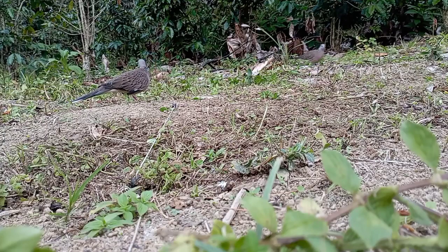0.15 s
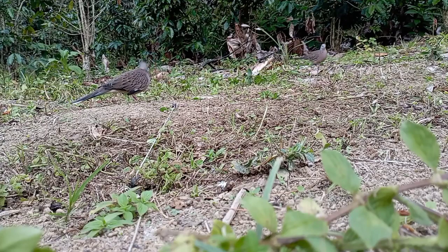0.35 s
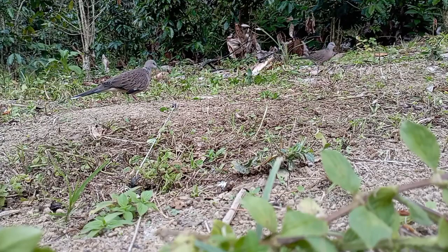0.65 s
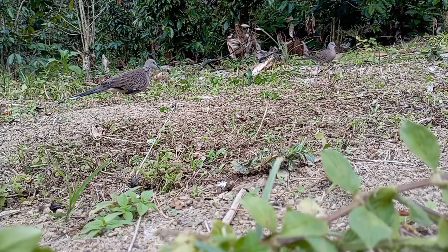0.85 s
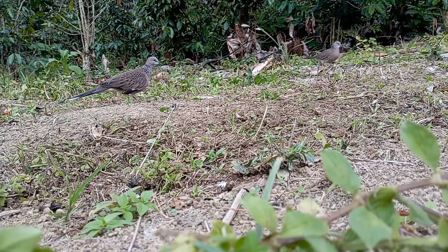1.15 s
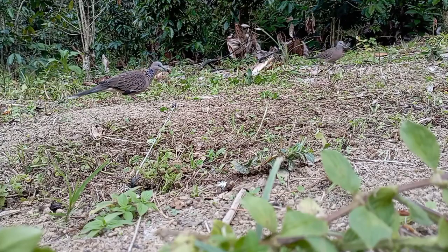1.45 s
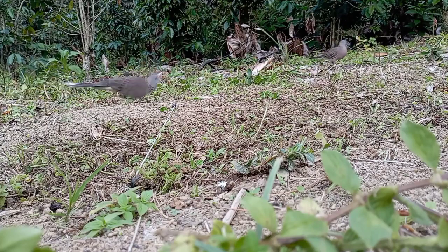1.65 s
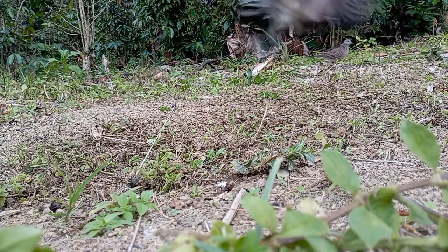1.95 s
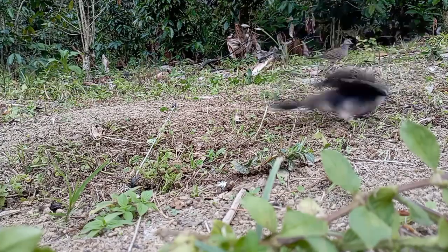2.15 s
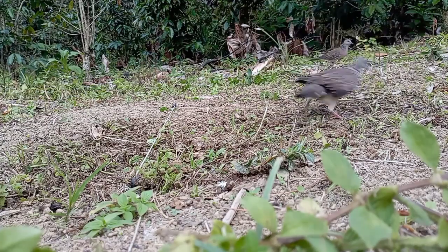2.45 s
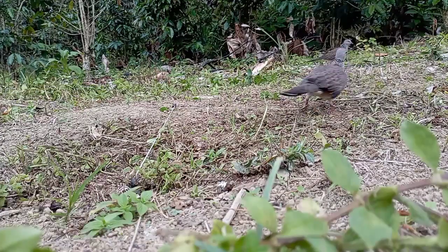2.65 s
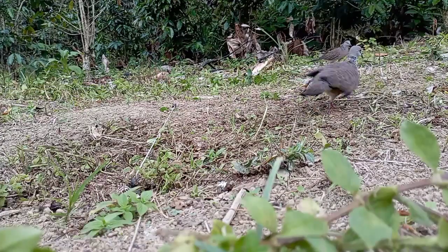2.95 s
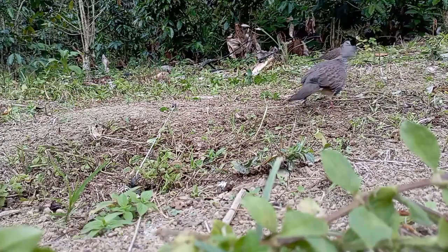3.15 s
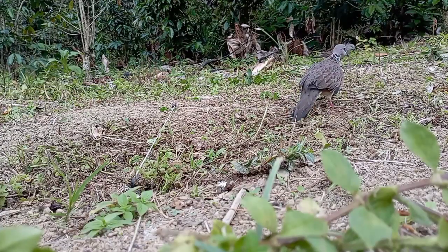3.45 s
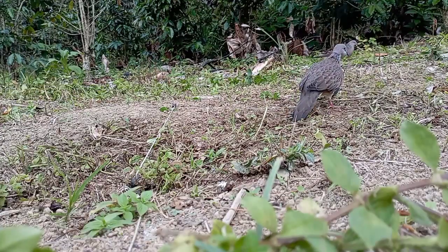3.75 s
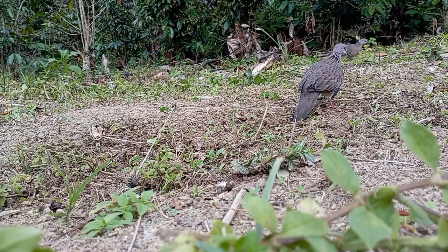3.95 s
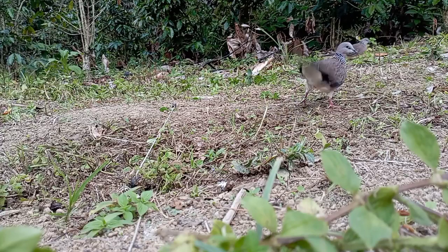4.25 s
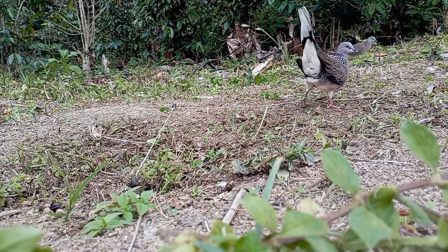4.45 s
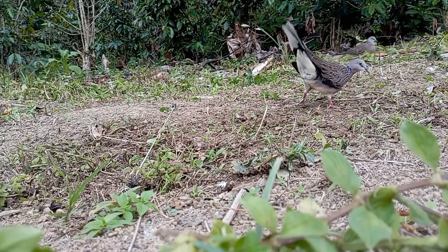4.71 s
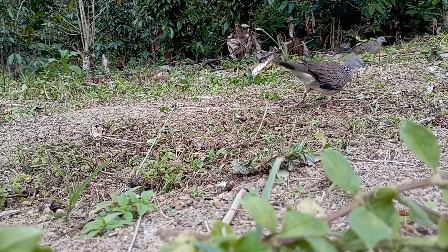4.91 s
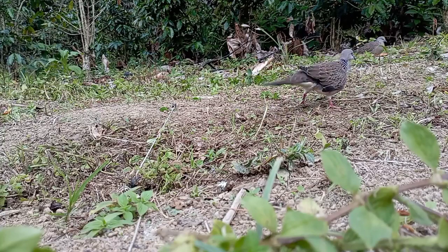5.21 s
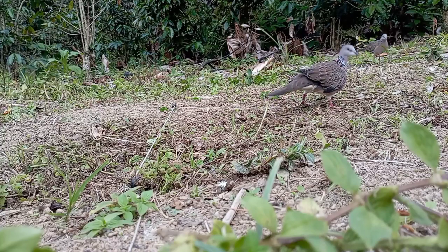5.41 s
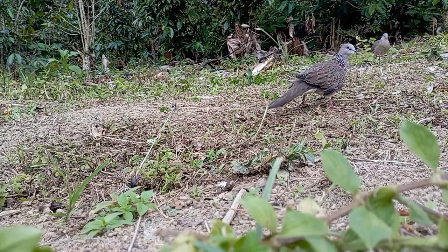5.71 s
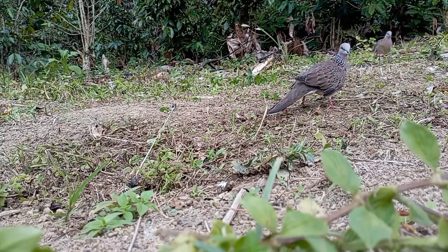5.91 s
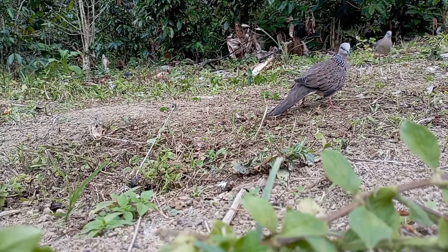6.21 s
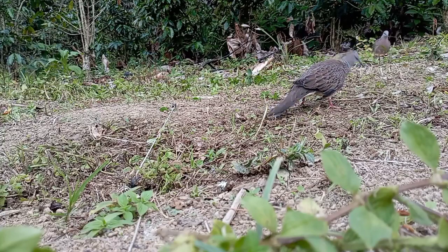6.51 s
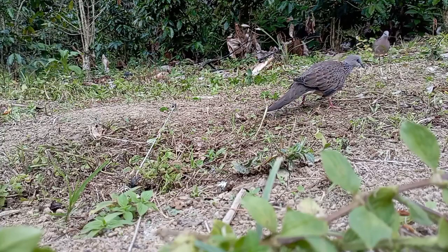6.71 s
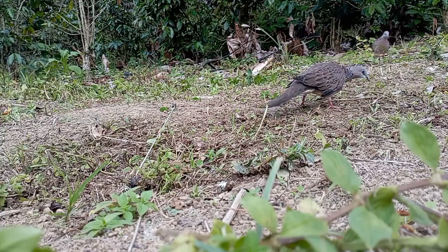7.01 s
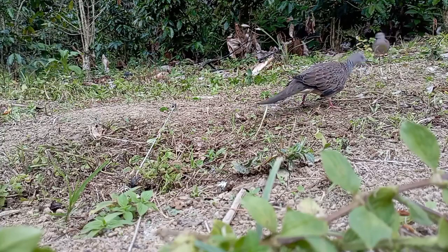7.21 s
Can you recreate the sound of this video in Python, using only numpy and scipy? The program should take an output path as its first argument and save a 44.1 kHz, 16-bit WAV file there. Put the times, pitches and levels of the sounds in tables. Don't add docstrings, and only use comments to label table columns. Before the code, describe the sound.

A dove's wings burst into a loud half-second clatter of claps and air puffs at 2 seconds, over quiet insect hiss and faint distant coos.

```python
import sys
import numpy as np
from scipy import signal
from scipy.fft import rfft, irfft, next_fast_len
from scipy.io import wavfile

SR = 44100
rng = np.random.default_rng(int(sys.argv[2]) if len(sys.argv) > 2 else 0)


def rack_gain(trim_db):
    fader = np.asarray(trim_db, float)
    return 10 ** (fader / 20)


def wav_record(signal):
    frames = np.transpose(np.atleast_2d(signal))
    bounded = np.clip(frames, -1, 1)
    quanta = np.round(bounded * 32767).astype(np.int16)
    wavfile.write(sys.argv[1], SR, quanta)


N = 325017

# (frequency [Hz], level [dB per Hz])
RUSTLE_SPECTRUM = [(1500, -8), (2570, -7), (3400, -5.5), (4460, -10.5), (6500, -5), (8770, -3.5),
                   (9700, 1.5), (12000, -7), (15300, -9.5), (16200, -46)]
# (frequency [Hz], left-right likeness [-1 to 1])
WING_LIKENESS = [(60, 0.97), (180, 0.97), (550, 0.92), (1650, 0.53), (4970, -0.38), (15000, 0.0015)]
SPREAD_S = 2.14


def rms_one(x):
    return x / np.sqrt(np.mean(x ** 2) + 1e-20)


def at_hz(points, hz):
    point_hz, value = np.array(points).T
    return np.interp(np.log(hz), np.log(point_hz), value)


def band(x, low_hz, high_hz):
    edges = [low_hz, min(high_hz, .45 * SR)]
    return signal.sosfilt(signal.butter(2, edges, "band", fs=SR, output="sos"), x)


def drift(rate):
    r = np.exp(-80 * np.pi * rate / SR)
    slow = signal.lfilter([1], [1, -2 * r, r * r], rng.standard_normal(N // 40 + 2002))
    slow = rms_one(slow[2000:])
    return np.interp(np.arange(N) / 40, np.arange(len(slow)), slow)


def coloured(spectrum, likeness, size):
    fast = next_fast_len(size, True)
    hz = np.maximum(np.fft.rfftfreq(fast, 1 / SR), 1)
    mid, side = rfft(rng.standard_normal((2, fast)))
    alike = np.clip(at_hz(likeness, hz), -1, 1)
    pair = np.sqrt(1 + alike) * mid + np.sqrt(1 - alike) * side * [[1], [-1]]
    return rms_one(irfft(pair * rack_gain(at_hz(spectrum, hz)), fast)[:, :size])


def air_noise(low_hz, high_hz, size):
    flat = [(20, 0), (20000, 0)]
    return rms_one(band(coloured(flat, WING_LIKENESS, size), low_hz, high_hz))


def panned(x, pan_db):
    return x * rack_gain([[pan_db / 2], [-pan_db / 2]])


def add(out, s, piece):
    i = round(s * SR)
    piece = piece[..., max(-i, 0):max(N - i, 0)]
    first = max(i, 0)
    out[..., first:first + piece.shape[-1]] += piece


def sine(hz):
    return np.sqrt(2) * np.sin(2 * np.pi * np.cumsum(hz) / SR)


def tone(hz, phase=0):
    return np.sqrt(2) * np.hanning(len(hz)) * np.sin(2 * np.pi * np.cumsum(hz) / SR + phase)


def foliage(x, wet_db, t60):
    t = np.arange(8192) / SR
    tail = rng.standard_normal((2, len(t))) * rack_gain(-60 * t / t60) * (t > .004)
    tail = tail / np.sqrt(np.sum(tail ** 2, axis=1, keepdims=True))
    return x + rack_gain(wet_db) * signal.oaconvolve(x, tail, axes=1)[:, :N]


def far_air():
    # (frequency [Hz], level [dB per Hz])
    spectrum = [(25, -43), (45, -14), (75, -0.5), (130, -1), (404, -8), (700, -14.5), (850, -21.5),
                (1700, -26), (4800, -24.5), (6900, -28), (9800, -26.5), (12800, -33), (15100, -34),
                (15350, -85)]
    # (frequency [Hz], left-right likeness [-1 to 1])
    likeness = [(60, 0.68), (180, 0.27), (550, 0.15), (1650, -0.11), (4970, -0.11), (15000, -0.0053)]
    level_db = -64 + 0.081 * drift(3.8)
    return rack_gain(level_db) * coloured(spectrum, likeness, N)


def hiss(choir, patchy_db, rate):
    out, white = 0, rng.standard_normal((2, 2, N))
    for k, (hz, width, level_db, pan_db) in enumerate(choir):
        noise = rms_one(band(white[k % 2], hz - width / 2, hz + width / 2))
        out = out + panned(rack_gain(level_db + patchy_db * drift(rate)) * noise, pan_db)
    return out


def cicadas():
    # (centre [Hz], width [Hz], level [dB], left minus right [dB])
    choir = [
        (8370, 670, -77, -1),
        (8696, 680, -70.5, 2),
        (9160, 430, -77, 3),
    ]
    # (time [s], level [dB])
    hush = [
        (2.2, 0.5),
        (2.5, -3),
        (2.799, -2.5),
        (3.1, -1.5),
        (4.5, 1),
    ]
    hush_db = np.interp(np.arange(N) / SR, *np.transpose(hush))
    return rack_gain(hush_db) * hiss(choir, patchy_db=0.8, rate=35)


def far_crickets():
    # (centre [Hz], width [Hz], level [dB], left minus right [dB])
    choir = [
        (5810, 300, -78, -3),
        (6180, 300, -79, -1),
        (5400, 300, -83, 0),
    ]
    return hiss(choir, patchy_db=2.5, rate=11.0)


def pulses(rows, from_hz, to_hz, ms, spread_db):
    out, chance = np.zeros(N), rng.standard_normal((len(rows), 2))
    track = np.linspace(from_hz, to_hz, int(ms * SR / 1000))
    for (s, level_db), (strength, turn) in zip(rows, chance):
        add(out, s - ms / 2000, rack_gain(level_db + spread_db * strength) * tone(track, np.pi * turn))
    return out


def trilling_cricket():
    # (first trill [s], last trill [s], trills [count])
    runs = [(-.11, .352, 3), (.568, 1.031, 3), (1.254, 2.875, 8), (3.099, 3.33, 2), (3.53, 3.976, 3),
            (4.208, 4.871, 4), (5.119, 5.358, 2), (5.582, 6.029, 3), (6.26, 6.715, 3), (6.947, 7.162, 2)]
    pulse_rate, rest = 62.6, 3.3
    starts = [np.linspace(a, b, count) for a, b, count in runs]
    starts = np.concatenate(starts + [[N / SR + .05]])
    rows = []
    for s, gap in zip(starts, np.diff(starts)):
        rows += [(s + k / pulse_rate, -71.5) for k in range(round(gap * pulse_rate - rest))]
    return panned(pulses(rows, 5080, 5750, ms=11, spread_db=2.0), 5)


def katydid():
    # (time [s], level [dB])
    first = [
        (.144, -83),
        (.423, -75),
        (.7, -79),
        (.981, -79),
        (1.259, -80),
        (1.54, -76),
        (1.822, -76),
    ]
    second = [(s + 0.062, level_db - 4.0) for s, level_db in first]
    return rack_gain(-1.0) * panned(pulses(first + second, 12200, 11900, ms=30, spread_db=0.5), 2.5)


def slow_cricket():
    # (first pulse [s], last pulse [s], pulses [count])
    runs = [
        (.355, .545, 4),
        (3.075, 3.541, 8),
        (4.864, 5.333, 8),
        (6.566, 7.019, 8),
    ]
    rows = []
    for a, b, count in runs:
        rows += [(s + gap, -78) for s in np.linspace(a, b, count) for gap in (-.009, .011)]
    return panned(pulses(rows, 4160, 4000, ms=20, spread_db=1.5), 4.5)


def falling_cricket():
    last = [
        3.148,
        3.467,
        3.778,
        4.057,
        4.372,
    ]
    counts, gap_s, level_db, swell_db = (1, 3, 3, 3, 3), .045, -73, 1
    rows = []
    for s, count in zip(last, counts):
        rows += [(s - k * gap_s, level_db - k * swell_db) for k in range(count)]
    return rack_gain(0.5) * panned(pulses(rows, 4800, 4140, ms=35, spread_db=-0.5), -1.8)


def near_singers():
    out = trilling_cricket() + katydid() + slow_cricket() + falling_cricket()
    return foliage(out, wet_db=-5, t60=.14)


def bird_notes(rows, rise_s, sag):
    out = np.zeros(N)
    for s, length, start_hz, top_hz, level_db in rows:
        u = np.linspace(0, 1, int(length * SR))
        track = top_hz - (top_hz - start_hz) * np.exp(-u * length / rise_s) - sag * length * u ** 3
        swell = signal.windows.tukey(len(u), .35)
        add(out, s, rack_gain(level_db) * swell * sine(track))
    return out


def doves():
    # (time [s], length [s], start pitch [Hz], top pitch [Hz], level [dB])
    coos = [
        (-.04, 0.083, 673, 670, -71),
        (.275, .15, 536, 767, -64.5),
        (.95, 0.094, 736, 694, -65.5),
        (1.385, .13, 558, 700, -69),
        (2.75, 0.095, 617, 710, -73.5),
        (5.8, 0.15, 577, 700, -79),
        (6.545, 0.091, 574, 772, -73.5),
    ]
    out = bird_notes(coos, .03, sag=680)
    s, end, rate, quickening = .61, .95, 20.3, 79
    t = np.arange(-.02, end - s, 1 / SR)
    throb = np.cos(np.pi * (rate * t + quickening * t ** 2 / 2)) ** 6
    swell = np.clip(0.55 + t / 0.25, 0, 1)
    purr = np.sin(2 * np.pi * np.cumsum(np.linspace(700, 710, len(t))) / SR)
    add(out, s + t[0], rack_gain(-67.5 + 7.5) * throb * swell * purr)
    return panned(out, -5.7)


def hoots():
    # (time [s], length [s], level [dB])
    short = [
        (.512, 0.021, -72),
        (.755, 0.026, -69.5),
        (.855, .045, -75),
        (.96, .041, -75),
        (1.09, .065, -77.5),
        (5.512, 0.02, -72),
        (5.73, 0.036, -74),
        (5.82, 0.029, -72),
        (5.925, 0.029, -73.5),
        (6.05, .029, -75),
    ]
    # (time [s], length [s], level [dB])
    held = [
        (.545, 0.11, -81),
        (.69, 0.033, -77),
        (5.545, 0.22, -81),
        (6.1, .06, -84),
    ]
    calls = [(s, length, 828, 1125, level_db) for s, length, level_db in short]
    calls += [(s, length, 1040, 1197, level_db) for s, length, level_db in held]
    return panned(bird_notes(calls, .014, sag=280), -2.7)


def whistle():
    # (time [s], length [s], start pitch [Hz], top pitch [Hz], level [dB])
    whistled = [
        (6.078, 0.094, 1660, 2800, -76),
        (6.165, .025, 2610, 2950, -82),
    ]
    return panned(bird_notes(whistled, .025, sag=2100), .1)


def birds():
    return rack_gain(-4.5) * foliage(doves() + hoots() + whistle(), wet_db=-9, t60=.15)


def strike(out, s, treble_db, body_db, ms, pan_db, body_hz, slap=False):
    size = 1024
    t = np.arange(size) / SR * 1000
    rise = .4 * ms
    shape = ((t / rise) * np.exp(1 - t / rise)) ** 3
    crackle = coloured(RUSTLE_SPECTRUM, WING_LIKENESS, 2 * size)
    ratio = 1.79 if s >= SPREAD_S else 1.17
    edges = body_hz / ratio, body_hz * ratio
    treble = band(band(crackle, 4800, 14300), 3800, 17000)[:, size:]
    body = band(band(crackle, *edges), *edges)[:, size:]
    mix = rms_one(shape * treble) + rack_gain(body_db) * rms_one(shape * body)
    if slap:
        flat = air_noise(796, 1930, 2 * size)[:, size:]
        mix = mix + rack_gain(body_db - 5) * rms_one(shape * flat)
    level = rack_gain(treble_db + 0.5) * np.sqrt(np.mean(shape ** 2))
    add(out, s - rise / 1000, panned(level * mix, pan_db))


def single_ticks():
    # (time [s], level [dB])
    snaps = [
        (.225, -62),
        (1.733, -68),
        (1.867, -60),
        (1.993, -54),
        (2.462, -60),
        (2.485, -63),
        (2.578, -66),
        (2.839, -58),
        (6.33, -70),
    ]
    out = np.zeros((2, N))
    for s, level_db in snaps:
        strike(out, s, level_db, body_db=-6, ms=0.97, pan_db=12, body_hz=4470)
    return out


def flight_noise():
    # (time [s], effort of the strokes [dB], rubbing of the feathers [dB])
    strokes = [
        (2.0, -75, -65.5),
        (2.029, -41.5, -50.5),
        (2.11, -40.5, -54),
        (2.135, -34.5, -44.5),
        (2.19, -44, -54),
        (2.27, -38, -46.5),
        (2.34, -38.5, -49.5),
        (2.43, -50, -59.5),
        (2.465, -67, -66),
    ]
    start, size = 1.9, 36000
    t = start + np.arange(size) / SR
    s, effort, rub = np.transpose(strokes)
    before, after = 222 * np.maximum(s[0] - t, 0), np.maximum(t - s[-1], 0)
    effort_db = np.interp(t, s, effort) - before - 128 * after
    rustle_db = np.interp(t, s, rub) - before - 62 * after
    flutter_db = effort_db - 13 - 26 * np.clip(t - s[0], 0, s[-1] - s[0])
    rustle = coloured(RUSTLE_SPECTRUM, WING_LIKENESS, size)
    opened = np.clip((t - s[1]) / (SPREAD_S - s[1]), 0, 1) ** 2
    gap = signal.butter(2, (2010, 3500), "bandstop", fs=SR, output="sos")
    thin = signal.sosfilt(gap, rustle)
    out = rack_gain(effort_db) * air_noise(58, 174, size)
    out += rack_gain(effort_db - 6.5) * air_noise(220, 545, size)
    out += rack_gain(flutter_db + 5.3 * drift(45)[:size]) * air_noise(570, 1440, size)
    out += rack_gain(rustle_db + 3.06 * drift(82)[:size]) * (opened * rustle + (1 - opened) * thin)
    whole = np.zeros((2, N))
    add(whole, start, out)
    return whole


def claps():
    # (time [s], treble level [dB], body minus treble [dB], left minus right [dB])
    hits = [(2.012, -59, -17, 4), (2.026, -24.5, -4, 5.5), (2.062, -33, -26, -1), (2.079, -48, -12, 2),
            (2.095, -35.5, -11.5, 3), (2.103, -49.5, -11, -1), (2.126, -39.5, -12, -1),
            (2.132, -37.5, -9, 4), (2.15, -53.5, 7.5, 2), (2.166, -26.5, -12.5, 2), (2.17, -44.5, -11, 7),
            (2.195, -51.5, 0, -2), (2.22, -36.5, -8, 2.5), (2.233, -36.5, -0.5, -4), (2.256, -43.5, 2, 2),
            (2.258, -43.5, -17, -5), (2.279, -31, -19, -3), (2.291, -48, -1.5, 1), (2.304, -32.5, -9, -1),
            (2.327, -35.5, -5, -1), (2.333, -38.5, -8, -2.5), (2.365, -54, -15, 1), (2.385, -56.5, -9, -3),
            (2.416, -55, -3, -1)]
    out = np.zeros((2, N))
    for s, treble_db, body_db, pan_db in hits:
        ms = 2.1 + 0.69 * max(-28.5 - treble_db, 0)
        spread = s >= SPREAD_S
        body_hz = 2530 if spread else 4520
        strike(out, s, treble_db, body_db, ms, pan_db, body_hz, slap=spread)
    return out


def puffs():
    # (time [s], level [dB], pitch [Hz])
    pushes = [(2.027, -24.5, 354), (2.026, -36.5, 1040), (2.047, -42, 910), (2.064, -25, 285),
              (2.082, -41, 770), (2.094, -24.5, 398), (2.133, -30.5, 324), (2.154, -34, 523),
              (2.159, -25, 328), (2.167, -42, 700), (2.171, -36, 290), (2.188, -31.5, 267), (2.2, -33, 335),
              (2.22, -30, 753), (2.232, -27, 355), (2.254, -24.5, 560), (2.275, -37, 270),
              (2.284, -25, 325), (2.302, -28, 315), (2.326, -19.5, 520), (2.332, -25, 406),
              (2.342, -33.5, 255), (2.363, -34, 276), (2.385, -41, 342), (2.418, -40.5, 486),
              (2.435, -47, 416), (2.448, -49.5, 409.4)]
    out = np.zeros((2, N))
    for (s, level_db, hz), turn in zip(pushes, rng.random(len(pushes))):
        ms = 5.5 - .08 * (level_db + 25)
        size = int(2.2 * ms * SR / 1000)
        swing = tone(np.linspace(.75, 1.05, size) * hz, 2 * np.pi * turn)
        torn = air_noise(0.52 * hz, 2.01 * hz, 2048)[:, -size:] * np.hanning(size)
        add(out, s - size / SR / 2, panned(rack_gain(level_db - 6.5) * (swing + 0.6 * torn), -0.77))
    return out


def scene():
    insects = cicadas() + far_crickets() + near_singers()
    dove = foliage(single_ticks() + flight_noise() + claps() + puffs(), wet_db=-28, t60=.2)
    return far_air() + insects + birds() + dove


def top_cut(x):
    return signal.sosfilt(signal.butter(12, 16650, fs=SR, output="sos"), x)


def record(dry):
    return top_cut(dry)


dry = scene()
out = record(dry)
wav_record(out)
```